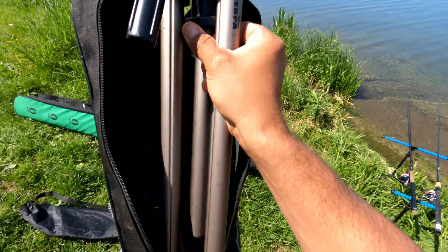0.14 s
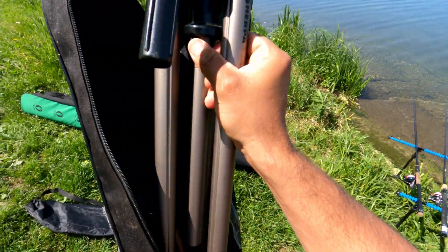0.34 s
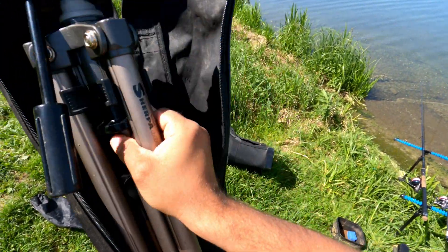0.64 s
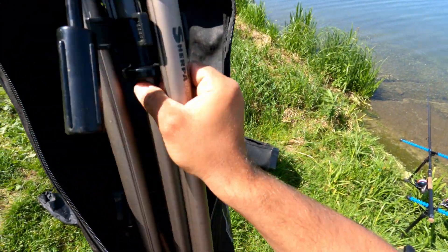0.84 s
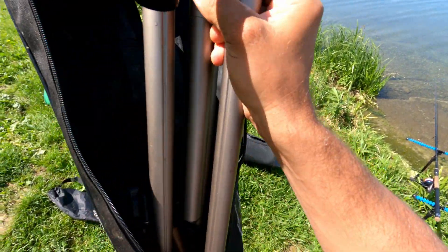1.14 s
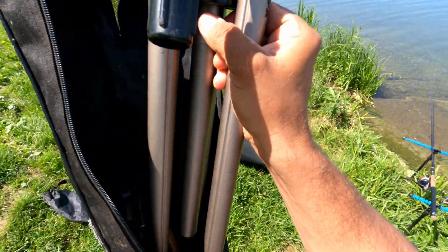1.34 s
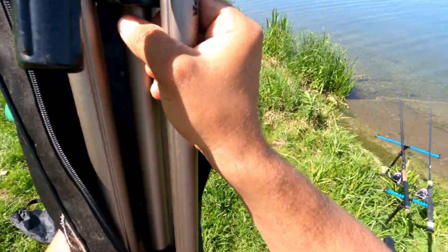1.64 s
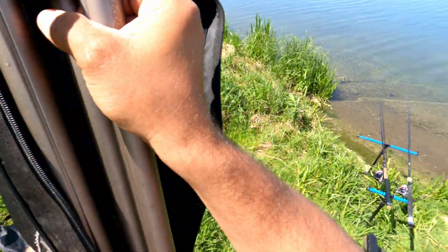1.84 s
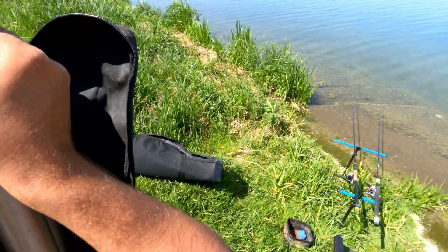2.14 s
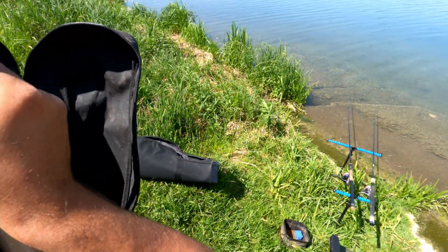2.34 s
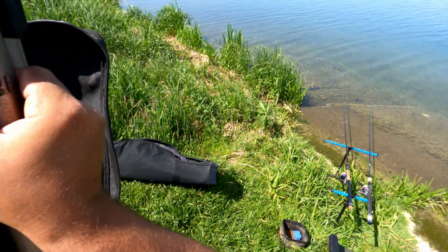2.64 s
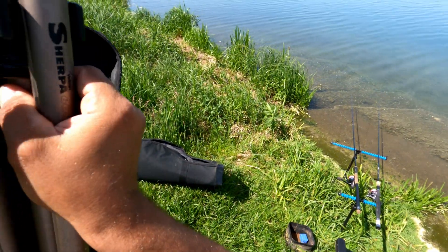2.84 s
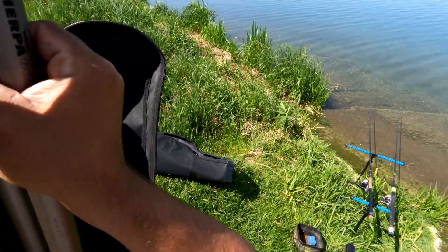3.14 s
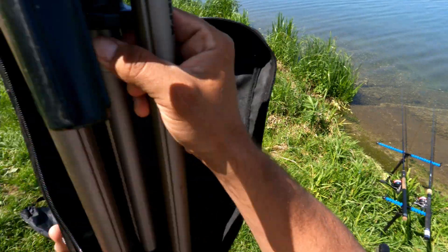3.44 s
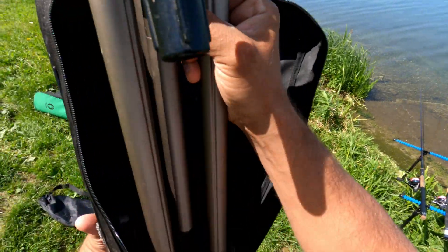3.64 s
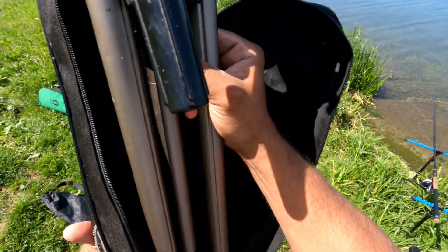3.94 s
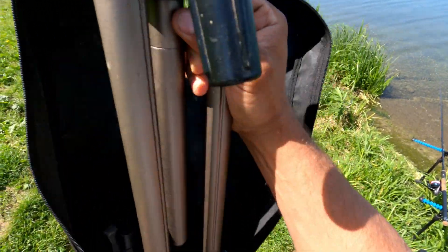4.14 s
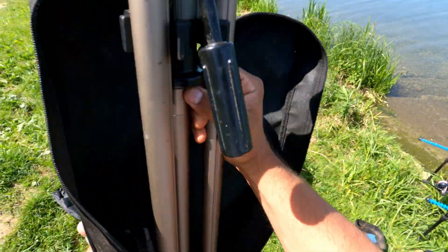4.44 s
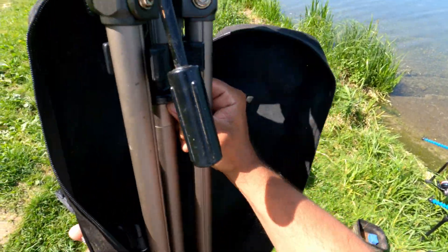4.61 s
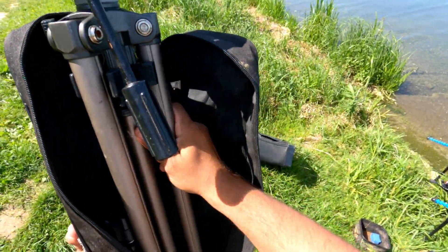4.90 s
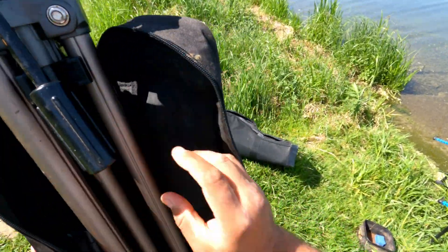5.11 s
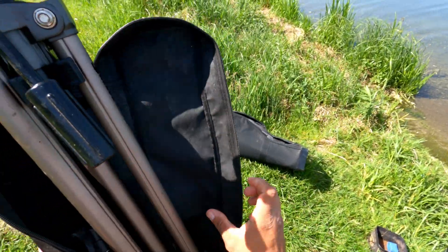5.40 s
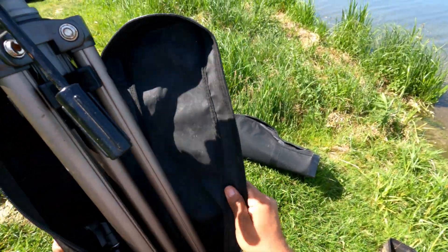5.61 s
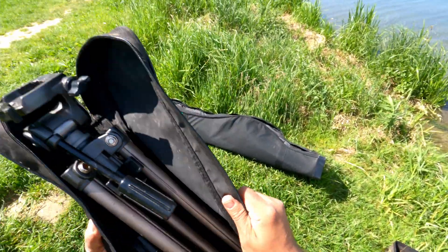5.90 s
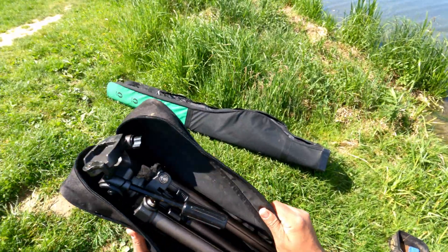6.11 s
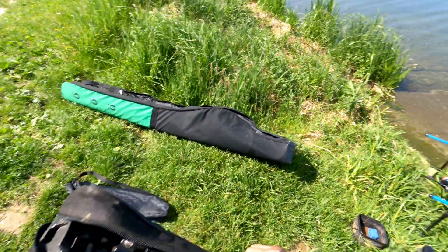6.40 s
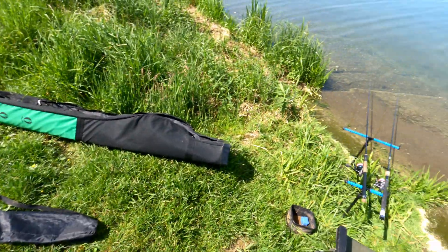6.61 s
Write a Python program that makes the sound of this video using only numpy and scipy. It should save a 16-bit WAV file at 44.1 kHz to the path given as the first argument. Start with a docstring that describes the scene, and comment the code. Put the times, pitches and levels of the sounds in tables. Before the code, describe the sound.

Stiff cloth rustles and scrapes as a folding tripod is pushed into a bag, its legs knocking, with wind rumbling on the microphone.

```python
"""A lake bank: a folding tripod is pushed into a stiff cloth bag, just below a body-worn microphone.
Cloth sticks and slips over the tubes, so the weave hisses and folds pop; a seam rasps, thin whistles
come and go. Legs and clamps knock and ring, clamps and zip pulls tick, bag and feet thump softly.
Wind and jolts through the body rumble in the microphone."""
import sys
import numpy as np
from scipy import signal
from scipy.fft import rfft, irfft, next_fast_len
from scipy.io import wavfile
from scipy.ndimage import uniform_filter1d

SR = 44100
rng = np.random.default_rng(int(sys.argv[2]) if len(sys.argv) > 2 else 0)


def dump_mix(stems):
    """Bounce the given channels to the path in sys.argv[1] as a 16-bit WAV at rate SR."""
    frames = np.atleast_2d(stems).T  # one column per channel
    limited = np.clip(frames, -1, 1)  # hard clip at full scale
    pcm = np.round(limited * 32767).astype(np.int16)
    wavfile.write(sys.argv[1], SR, pcm)


N = 298027
TIME_S = np.arange(N) / SR


def undb(db):
    return 10 ** (np.asarray(db) / 20)


def unit_rms(x):
    return x / np.sqrt(np.mean(x ** 2))


def curve(points):
    return np.interp(TIME_S, *np.transpose(points))


def band(x, lo_hz, hi_hz, order=2):
    return signal.sosfilt(signal.butter(order, [lo_hz, hi_hz], "band", fs=SR, output="sos"), x)


def colour(x, spectrum):
    """Filter by (freq_hz, gain_db) points; unit RMS."""
    hz, db = np.transpose(spectrum)
    size = next_fast_len(N)
    bins_hz = np.maximum(np.arange(size // 2 + 1) * SR / size, 1)
    gain = undb(np.interp(np.log(bins_hz), np.log(hz), db))
    return unit_rms(irfft(rfft(x, size) * gain, size)[:N])


def ring(x, hz, t60_s):
    """One decaying mode."""
    r, w = np.exp(-np.log(1000) / (t60_s * SR)), 2 * np.pi * hz / SR
    return signal.lfilter([np.sin(w)], [1, -2 * r * np.cos(w), r * r], x)


def wander(rate_hz):
    """Random steps, smoothed twice; unit RMS."""
    hold = int(SR / rate_hz)
    steps = np.repeat(rng.standard_normal(N // hold + 1), hold)
    return unit_rms(uniform_filter1d(uniform_filter1d(steps, hold), hold)[:N])


# freq_hz, gain_db
RUMBLE_SPECTRUM = [(15, -8), (59, 6), (150, -2.5), (300, -12), (600, -70)]
# peak_s, level_db
JOLTS = [(0.0, -27.5), (.45, -29), (0.676, -25), (0.851, -33), (1.23, -32), (1.78, -34), (2.39, -27),
         (3.04, -34), (3.22, -28), (3.81, -25.5), (3.91, -39), (4.092, -29.5), (4.519, -28.5),
         (4.785, -28.5), (5.33, -27.5), (5.64, -29.5), (5.72, -20.5), (5.798, -15.5), (6.05, -28.5),
         (6.25, -32)]


def wind_and_jolts(wind_db=-44.5, rise_s=0.032, fall_db_per_s=185):
    """Gusty microphone rumble: wind plus jolts through the body that rise fast and die away."""
    power = np.full(N, undb(wind_db) ** 2)
    for peak_s, level_db in JOLTS:
        since_s = TIME_S - peak_s
        rise = np.clip(1 + since_s / rise_s, 0, 1)
        power += (rise * undb(level_db - fall_db_per_s * np.maximum(since_s, 0))) ** 2
    return colour(rng.standard_normal(N), RUMBLE_SPECTRUM) * np.sqrt(power) * undb(2 * wander(23))


# start_s, end_s, pitch_hz, level_db; the last row is a struck ring, not a whistle
WHISTLES = [(0.69, 0.75, 6700, -38), (0.80, 1.08, 10500, -45), (1.96, 2.03, 10200, -46),
            (2.24, 2.36, 6350, -42), (5.83, 5.89, 6260, -29)]


def whistles(sag_per_s=0.14):
    """Thin, rough tones that sag a little and fade; the same shape gives a brief ring near 5.8 s."""
    out = np.zeros(N)
    for start_s, end_s, pitch_hz, level_db in WHISTLES:
        progress = np.clip((TIME_S - start_s) / (end_s - start_s), 0, 1)
        glide_hz = pitch_hz * (1 - sag_per_s * (end_s - start_s) * progress)
        tone = np.sin(2 * np.pi * np.cumsum(glide_hz) / SR)
        out += tone * (1 + wander(300) / 3) * np.sqrt(progress) * (1 - progress) * undb(level_db)
    return out


# start_s, end_s, from_hz, to_hz, level_db
SEAM_RASP = (0.94, 1.05, 3700, 4500, -35)


def seam_rasp():
    """A seam scrapes a tube: a rough band climbs as it speeds up, over a stronger one an octave down."""
    start_s, end_s, from_hz, to_hz, level_db = SEAM_RASP
    progress = np.clip((TIME_S - start_s) / (end_s - start_s), 0, 1)
    phase = 2 * np.pi * np.cumsum(from_hz + (to_hz - from_hz) * progress) / SR
    scrape = np.sin(phase) * wander(1500) + 1.5 * np.sin(phase / 2 + 1) * wander(1500)
    return scrape * np.sin(np.pi * progress) * undb(level_db)


# time_s, hiss_db
RESTING_RUSTLE = [(0, -49), (2.15, -50), (2.21, -53.5), (2.45, -44), (2.52, -56), (2.78, -50),
                  (5.44, -51.5), (5.48, -56.5), (5.61, -60), (5.66, -48), (6.76, -48.5)]
# start_s, stop_s, hiss_db, pops_db
DRAGS = [(0.154, 0.239, -42, -42), (0.335, 0.52, -41, -33), (0.48, 0.685, -39.5, -37),
         (0.742, 0.935, -38, -34), (0.902, 1.025, -34, -34.5), (1.002, 1.28, -55, -48),
         (1.297, 1.587, -47, -48), (1.58, 1.774, -42, -38), (1.9, 1.986, -40.5, -41),
         (2.625, 2.91, -56, -70), (3.107, 3.285, -43.5, -37.5), (3.31, 3.426, -48, -42),
         (3.704, 3.892, -39.5, -36.5), (4.065, 4.198, -37.5, -30), (4.338, 4.514, -36.5, -33.5),
         (4.624, 4.844, -39.5, -45.5), (4.966, 5.008, -40, -54), (5.086, 5.236, -50, -68),
         (5.28, 5.374, -41.5, -39.5), (5.661, 5.817, -24.5, -23), (6.122, 6.286, -41, -40.5),
         (6.35, 6.456, -47, -37)]


def drag_envelopes(attack_s=0.0082, swell_share=0.54, fall_db_per_s=346, rest_pops_db=3):
    """Gains of hiss and pops: each drag of cloth swells and stops short, over a faint rustle."""
    rest_db = curve(RESTING_RUSTLE)
    power = undb([rest_db, rest_db + rest_pops_db]) ** 2
    for start_s, stop_s, hiss_db, pops_db in DRAGS:
        rise = np.clip((TIME_S - start_s) / (attack_s + swell_share * (stop_s - start_s)), 0, 1)
        fall = undb(-fall_db_per_s * np.maximum(TIME_S - stop_s, 0))
        power += np.outer(undb([hiss_db, pops_db]), rise * fall) ** 2
    return np.sqrt(power)


def stick_slip(rate_hz, spread_db, tail_s, jump_db):
    """Noise that jumps at each random release and decays back."""
    releases = rng.random(N) < rate_hz / SR
    jumps = releases * undb(jump_db + spread_db * np.minimum(rng.exponential(size=N), 3))
    tails = signal.lfilter([1], [1, -np.exp(-1 / (tail_s * SR))], jumps)
    return unit_rms(rng.standard_normal(N) * (1 + tails))


# freq_hz, gain_db
WEAVE_SPECTRUM = [(880, -61), (1500, -4.5), (2520, -9.5), (3400, -11), (3670, -8.5), (6430, -13.5),
                  (8250, -18), (11900, -26.5), (15000, -32)]


def cloth(hiss_gain, pops_gain):
    """The weave hisses and crackles in independent bands; folds of several sizes pop lower down."""
    edges_hz = 800, 1900, 3100, 4700, 7500, 18000
    weave, folds = np.zeros((2, N))
    for lo_hz, hi_hz in zip(edges_hz, edges_hz[1:]):
        crackle = stick_slip(rate_hz=60, spread_db=3, tail_s=0.0022, jump_db=0)
        weave += band(crackle, lo_hz, hi_hz) * undb(1.3 * wander(16))
    for fold_hz in 361, 576, 1028, 1360:
        pops = stick_slip(rate_hz=25, spread_db=2.5, tail_s=0.00091, jump_db=11.5)
        folds += unit_rms(ring(pops, fold_hz, t60_s=6 / fold_hz))
    hiss = colour(weave, WEAVE_SPECTRUM) * hiss_gain * undb(3.05 * wander(30))
    return hiss + unit_rms(folds) * pops_gain * undb(3 * wander(30))


# pitch_hz, t60_s, level_db
TUBE_MODES = [(3920, 0.029, -2.5), (4540, 0.0026, 3), (5630, 0.0028, 2.5)]


def blow(start_s, body_db, thud_db, snap_db, rattle_s, body_hz, thud_hz=None):
    """A sharp contact and brief rattle ring a body note, a hollow thud and the tubes."""
    t = np.arange(4096) / SR
    force = rng.standard_normal(len(t)) * np.exp(-t / rattle_s)
    force[:5] += undb(10) * np.hanning(5)  # first contact
    grip = rng.standard_normal((len(TUBE_MODES) + 1, 2))  # shifts each mode's pitch and level
    tubes = sum(unit_rms(ring(force, hz * (1 + 0.044 * detune), t60_s)) * undb(db + 10 * lift)
                for (hz, t60_s, db), (detune, lift) in zip(TUBE_MODES, grip))
    thud = ring(force, thud_hz or 600 * 2 ** (0.46 * grip[-1, 0]), t60_s=0.018)
    body = ring(force, body_hz, t60_s=0.0067)

    def radiate(ringing, lo_hz, hi_hz):
        bare = unit_rms(band(force, lo_hz, hi_hz, order=3))
        return unit_rms(band(ringing, lo_hz, hi_hz)) + undb(-3) * bare

    parts = [(radiate(body, 700, 2300), body_db),
             (radiate(thud, 150, 1000), thud_db),
             (radiate(tubes, 2900, 7500), snap_db),
             (band(force, 6500, 10500, order=3), snap_db - 13.5)]
    hit = sum(part / np.abs(part).max() * undb(peak_db) for part, peak_db in parts)
    return np.pad(hit, (int(start_s * SR), N))[:N]


# start_s, level_db, pitch_hz
THUMPS = [(0.712, -17.5, 550), (1.773, -22.5, 466), (1.865, -25, 394), (2.344, -17, 516), (2.382, -19, 280),
          (2.4, -16, 596), (3.52, -24, 390), (3.754, -11.5, 354), (3.943, -23.5, 324), (4.089, -23, 230),
          (4.381, -21.5, 680), (4.522, -23, 480), (4.733, -17.5, 278), (4.773, -20.5, 262),
          (5.047, -23.5, 433), (5.291, -19.5, 610), (5.642, -15.5, 497), (5.413, -18.5, 420),
          (6.007, -18, 560), (6.022, -16.5, 1090), (6.046, -22.5, 433), (6.107, -15.5, 605),
          (6.202, -17.5, 470), (6.308, -21, 1090), (6.364, -18.5, 880), (6.526, -28.5, 490),
          (6.661, -22, 700), (6.675, -17.5, 550), (6.709, -21.5, 487)]


def thumps(delay_s=0.00197):
    """Soft blows of bag and feet; each sounds a moment after its listed time."""
    return sum(blow(start_s + delay_s, body_db=db - 20, thud_db=db, snap_db=db - 33,
                    rattle_s=0.0018, body_hz=2 * hz, thud_hz=hz) for start_s, db, hz in THUMPS)


# start_s, level_db, rattle_s
TICKS = [(1.154, -37, .002), (1.456, -25, .002), (1.5043, -28, .002), (1.5233, -23.5, 0.0017),
         (2.406, -17, 0.0036), (3.024, -17.5, 0.0079), (3.101, -30.5, 0.0045), (5.462, -35, 0.0025),
         (5.633, -22.5, 0.0093), (6.388, -31, 0.0025), (6.48, -30, 0.0042)]


def ticks():
    """Bright, light blows of clamps and zip pulls."""
    return sum(blow(start_s, body_db=db - 4.5, thud_db=db - 9, snap_db=db,
                    rattle_s=rattle_s, body_hz=2400) for start_s, db, rattle_s in TICKS)


# start_s, body_db, thud_offset_db, snap_offset_db, body_hz
KNOCKS = [(0.0034, -7, -8, 0, 1240), (0.429, -11, -7.5, -0.5, 1430), (0.4714, -10, -11, -4.5, 1430),
          (0.6623, -12.5, 0, -2.5, 1500), (0.8592, -13.5, -18, -19, 1280), (0.8776, -9, -16, -6.5, 1610),
          (0.929, -14.5, -12, -3.5, 1450), (1.273, -21.5, -9, -4, 1730), (1.3318, -16, -6, -10.5, 1230),
          (1.6275, -14.5, -3.5, -1.5, 1360), (2.1291, -23, -2, -10, 1100), (2.4684, -12, -5, -13, 1180),
          (2.492, -23, -6, -21, 1650), (2.5504, -13, -6.5, -32, 1180), (2.886, -20, -5, -11, 1590),
          (3.0094, -17.5, -3.5, -4.5, 1530), (3.02, -14.5, 1, -3, 1550), (3.0556, -11, -10.5, 2.5, 1960),
          (3.1817, -17.5, -7, 10.5, 1120), (3.257, -14, -10, 1.5, 1060), (3.2916, -22, -21, -1.5, 1010),
          (3.7723, -10, -6, -5, 1140), (3.8714, -12.5, -4, -12.5, 960), (3.9937, -13, -4.5, -6.5, 1810),
          (4.5043, -10, -15, 4.5, 1370), (4.7718, -12, -13.5, -6, 1520), (5.3038, -17, -18, -16, 1250),
          (5.336, -13, -0.5, -11.5, 970), (5.6814, -16, 2.5, -15, 1070), (5.775, -13, -8, 1, 1320),
          (5.8005, -7, -2, -21, 1320), (5.8287, -4.5, -13, 3, 1850), (5.9024, -21.5, -6, -22, 1010),
          (6.231, -18.5, -1.5, -12, 1190), (6.272, -18.5, -4.5, -20, 1050),
          (6.4142, -11.5, -11.5, -24, 1290)]


def knocks(max_rattle_s=0.0032, db_per_doubling=18):
    """Legs and clamps strike; brighter blows rattle longer, up to a limit."""
    out = np.zeros(N)
    for start_s, body_db, thud_offset_db, snap_offset_db, body_hz in KNOCKS:
        rattle_s = max_rattle_s * 2 ** (min(snap_offset_db, 0) / db_per_doubling)
        out += blow(start_s, body_db, body_db + thud_offset_db, body_db + snap_offset_db,
                    rattle_s, body_hz)
    return out


# time_s, left_minus_right_db
GEAR_PAN = [(0, -1), (1.9, -0.5), (2.2, 5), (3.4, 4), (3.6, -1), (6.4, 0), (6.76, 4.5)]


def scene():
    """Gear panned as it is held; body and ground scatter its sound unequally to the two ports."""
    hiss_gain, pops_gain = drag_envelopes()
    gear = cloth(hiss_gain, pops_gain) + knocks() + thumps() + ticks() + whistles() + seam_rasp()
    scatter = band(rng.standard_normal(2048) * np.exp(-TIME_S[:2048] / 0.0047), 1120, 3300, order=1)
    side = undb(-16.5) * signal.fftconvolve(gear, scatter / np.linalg.norm(scatter))[:N]
    side += undb(-20) * band(rng.standard_normal(N), 9000, 14000) * hiss_gain  # wide treble rustle
    side -= 0.32 * np.gradient(gear)  # left port lags slightly
    side += np.tanh(curve(GEAR_PAN) * np.log(10) / 40) * band(gear, 500, 12000, order=1)
    side += undb(-28) * wind_and_jolts()
    mid = gear + wind_and_jolts()
    return np.array([mid + side, mid - side])


def record(dry, rolloff_hz=13500, cutoff_hz=15750):
    """Microphone treble roll-off, soft clipping, steep low-pass."""
    dull = signal.sosfilt(signal.butter(8, rolloff_hz, fs=SR, output="sos"), dry)
    return signal.sosfilt(signal.ellip(10, .2, 80, cutoff_hz, fs=SR, output="sos"), np.tanh(dull))


dry = scene()
out = record(dry)
dump_mix(out)
```